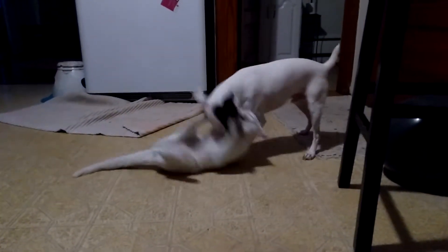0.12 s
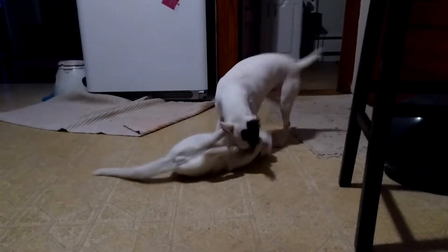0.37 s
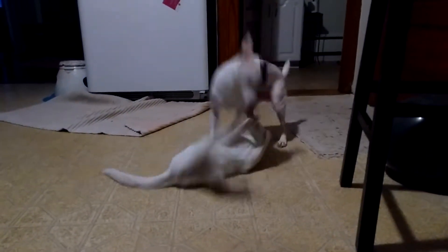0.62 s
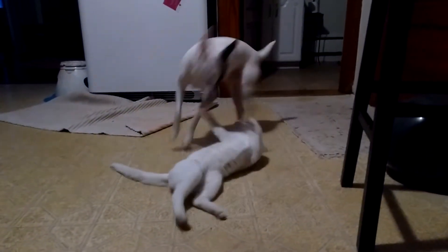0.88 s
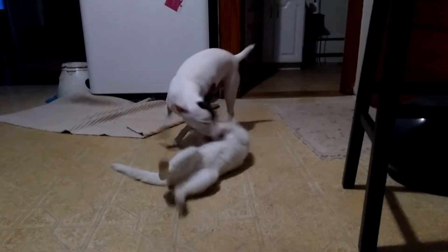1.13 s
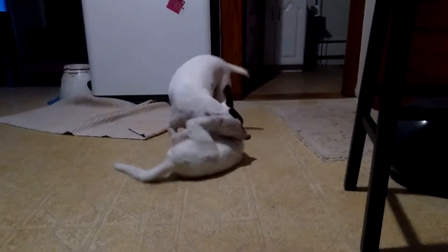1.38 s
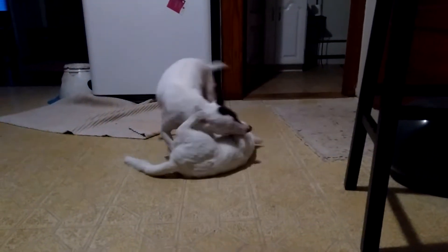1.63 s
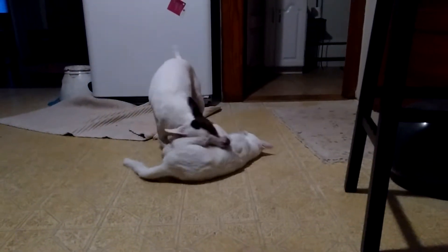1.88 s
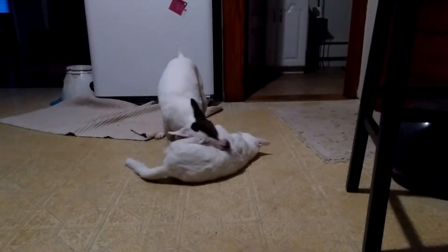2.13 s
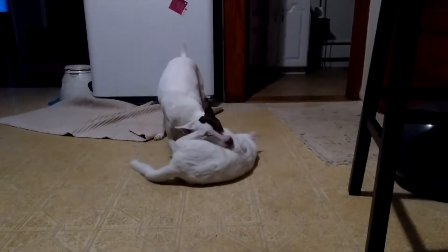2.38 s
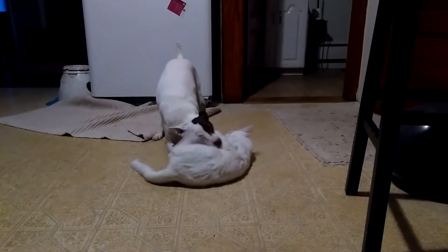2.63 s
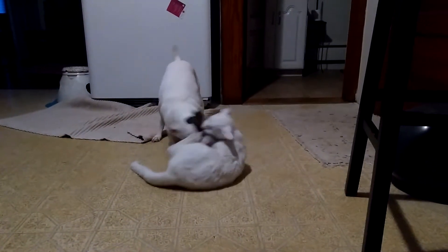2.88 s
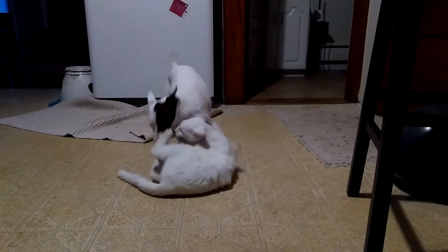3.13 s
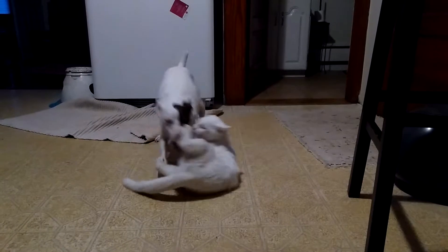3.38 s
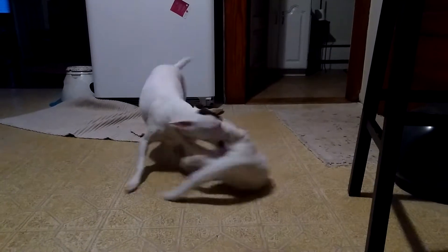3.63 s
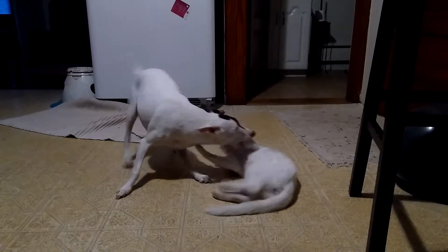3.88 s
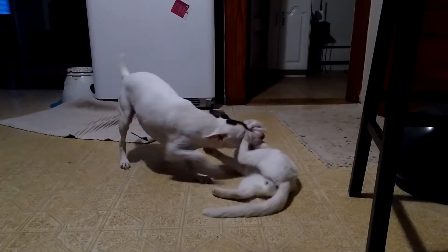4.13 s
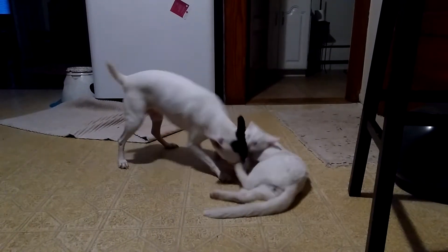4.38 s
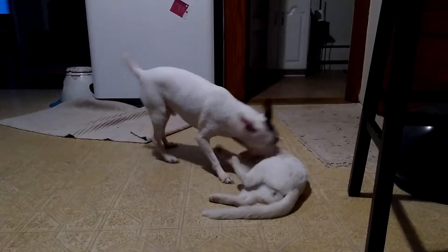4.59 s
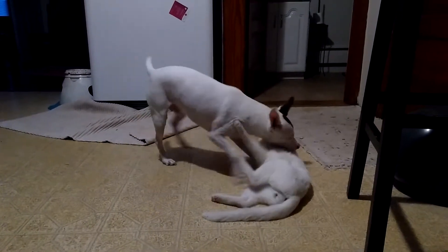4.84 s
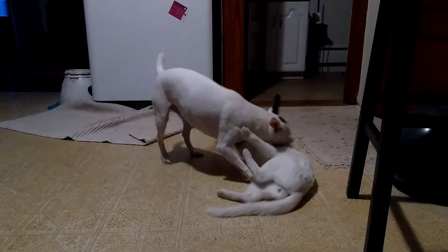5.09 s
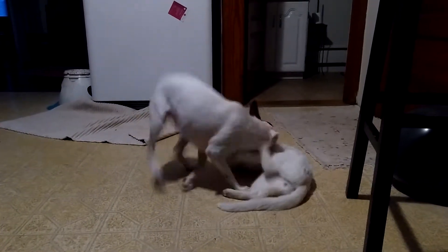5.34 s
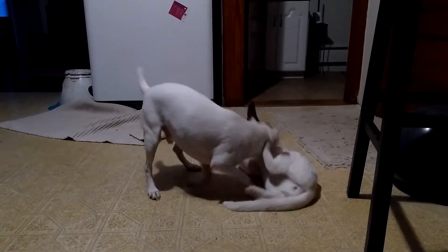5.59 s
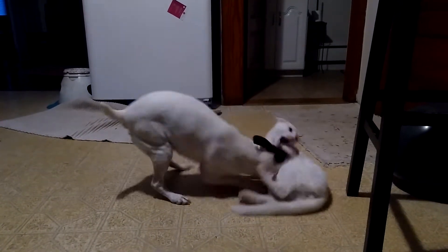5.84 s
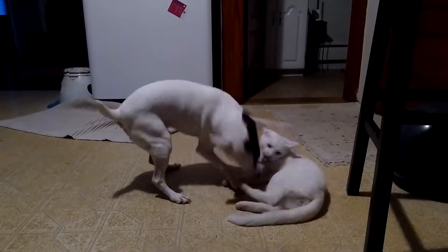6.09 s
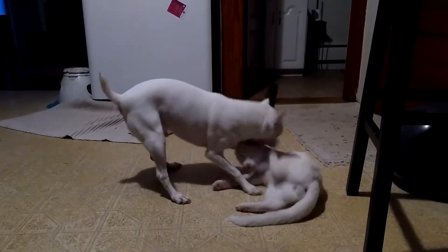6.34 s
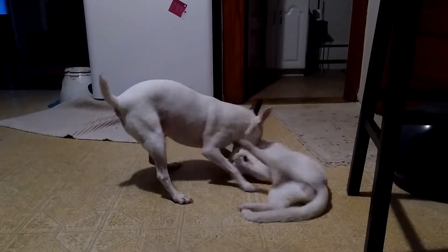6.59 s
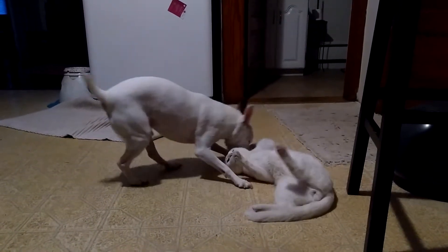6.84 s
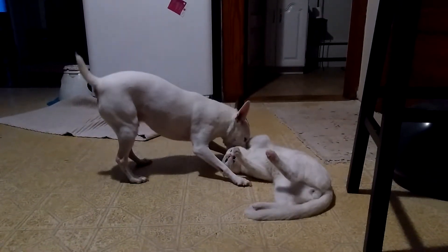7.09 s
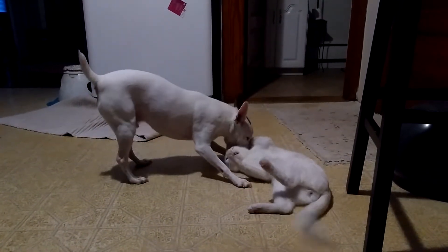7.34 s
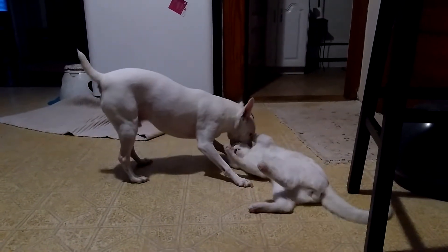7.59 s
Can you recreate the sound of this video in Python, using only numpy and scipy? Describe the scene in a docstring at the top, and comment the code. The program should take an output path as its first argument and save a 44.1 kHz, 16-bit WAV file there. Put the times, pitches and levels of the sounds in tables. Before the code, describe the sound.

Animal claws click, scratch and skid in quick irregular flurries on a hard kitchen floor, with soft body thumps and one short dog snort.

```python
"""Claws strike, tick and slide on a hard kitchen floor, close to a phone, as a dog and a cat wrestle.
Claws are shaped bursts of gritty noise and short rings; bodies thump as decaying floor modes over dull noise.
The dog snorts once, filtered noise; a faint rumble and hiss lie behind, and the kitchen echoes each sound.
Two microphones form left and right by taking a delayed copy of each off the other; the whole level
sinks and creeps back along a set curve."""
import sys
import numpy as np
from scipy import signal
from scipy.fft import rfft, irfft, next_fast_len
from scipy.io import wavfile
from scipy.ndimage import uniform_filter1d, map_coordinates

SR = 44100
rng = np.random.default_rng(int(sys.argv[2]) if len(sys.argv) > 2 else 0)


def linear_from_db(decibels):
    """Turn decibels (scalar or array-like) into linear amplitude factors; 0 gives 1."""
    return 10 ** (np.asarray(decibels, float) / 20)


def wav_out(sig):
    """Save sig, one row per channel (or a flat mono array), as 16-bit PCM at SR to the path in sys.argv[1]."""
    wavfile.write(sys.argv[1], SR, np.round(np.clip(np.atleast_2d(sig).T, -1, 1) * 32767).astype(np.int16))


N = 340452


def unit(x):
    """Scales to rms 1 along the last axis."""
    return x / np.sqrt(np.mean(x ** 2, axis=-1, keepdims=True) + 1e-20)


def along(points, hz):
    """Reads a curve of (Hz, value) points on a log frequency axis."""
    f, v = np.transpose(points)
    return np.interp(np.log(hz + 1), np.log(f + 1), v)


def filtered(x, response):
    """Multiplies the spectrum of x by a response given as a function of frequency."""
    m = next_fast_len(x.shape[-1] + 4096)
    spectrum = rfft(x, m) * response(np.fft.rfftfreq(m, 1 / SR))
    return irfft(spectrum, m)[..., :x.shape[-1]]


def bump(hz, centre_hz, width):
    """A bell over log frequency, 1 at its centre; width is a log ratio."""
    return np.exp(-(np.log((hz + 1) / centre_hz) / width) ** 2)


def sag_db(s):
    """The slow sinking and return of the whole level, in dB."""
    # Each row: time in seconds, gain in dB.
    sag_points = [(0, -2.5), (.8, -5), (1.1, -8), (2.1, -4), (3.2, -1.5), (3.8, -1.5), (4.06, -14),
                  (4.28, -10.5), (4.9, -4), (5.05, -15), (5.4, -8), (5.75, -10.5), (5.92, -18.5),
                  (6.2, -18), (6.6, -14), (7.1, -10), (7.72, -5)]
    return np.interp(s, *np.transpose(sag_points))


def kitchen(x, wet_db):
    """Direct sound and an echo whose decay depends on frequency, drawn anew for every sound."""
    # Decay time of the room. Each row: frequency in Hz, time to fall 60 dB in seconds.
    room_decay = [(150, 0.51), (500, 0.53), (1400, 0.45), (3700, 0.36), (9700, 0.28), (16000, 0.17)]
    length = SR // 2
    hz, t, z = signal.stft(rng.standard_normal((2, length)), SR, nperseg=256)
    decay = linear_from_db(-60 * t / along(room_decay, hz)[:, None])
    tail = signal.istft(z * decay, SR, nperseg=256)[1][:, :length]
    tail *= 1 - np.exp(-np.arange(length) / SR / 0.0018)  # echoes thicken over the first milliseconds
    tail *= linear_from_db(wet_db) / np.linalg.norm(tail[0])
    tail[0, 0] = 1
    tail[1, rng.integers(4, 30)] += 0.8  # direct sound reaches the second channel a few samples late
    return signal.fftconvolve(x[None], tail, axes=1)


def add(mix, s, db, sound):
    """Places a sound at s seconds, raised by as much as the sag will take away at its start."""
    spot = mix[:, round(s * SR):][:, :sound.shape[1]]
    spot += linear_from_db(db - sag_db(s)) * sound[:, :spot.shape[1]]


def grit(count, spiky_db):
    """Noise of tiny catches, as on a rough texture: in clumps, a few much bigger than the rest."""
    clumps = map_coordinates(rng.standard_normal(count // 100 + 4), [np.arange(count) * 160 / SR])
    spikes = np.minimum(rng.exponential(size=count), 4)
    return unit(rng.standard_normal(count) * linear_from_db(spiky_db * spikes + 2.9 * clumps))


def rumble():
    """House rumble and thin hiss: shaped noise in slowly shifting patches of time and frequency."""
    # Spectrum of the room's background. Each row: frequency in Hz, relative level in dB per Hz.
    air = [(25, -23), (60, -10.5), (119, -2), (160, -6), (204, 2), (255, -7.5), (313, -3.5), (420, -14),
           (900, -16), (2000, -22.5), (3500, -25.5), (5000, -32), (8000, -30.5), (8500, -27), (9100, -30.5),
           (16000, -37.5)]
    z = signal.stft(rng.standard_normal((2, N)), nperseg=1024)[2]
    patches = uniform_filter1d(rng.standard_normal(z.shape[1:]), 5, 0)
    patches = uniform_filter1d(patches, 5, 1)
    patchy = z * linear_from_db(2.35 * patches / patches.std())
    noise = signal.istft(patchy, nperseg=1024)[1][:, :N]
    return linear_from_db(-50.5) * unit(filtered(noise, lambda hz: linear_from_db(along(air, hz))))


def snort(mix):
    """A fluttering puff of air: gritty noise through the nose's resonances, dull above them."""
    # The dog's puff. Each row: start in seconds, level in dB, decay time in seconds.
    puffs = [(6.932, -33, 0.049)]
    # Resonances of the nose. Each row: centre in Hz, width in Hz, level in dB.
    resonances = [(380, 110, -20), (760, 190, -3.5), (1060, 230, -0.5), (1238, 70, 4.5)]

    def nose(f):
        total = sum(linear_from_db(db) * 1j * f * width / (centre ** 2 - f ** 2 + 1j * f * width)
                    for centre, width, db in resonances)
        return total / (1 + (f / 1450) ** 8)

    for s, db, length in puffs:
        t = np.arange(round(5 * length * SR)) / SR
        air_burst = unit(filtered(grit(len(t), spiky_db=0.5), nose))
        puff = air_burst * np.exp(-t / length) * (1 - np.exp(-t / 0.00057))
        add(mix, s, db, kitchen(puff, wet_db=-2.5))


def thumps(mix):
    """A soft landing makes the floor boards boom briefly, over a dull flop of fur."""
    # Bodies and paws landing. Each row: start in seconds, level in dB, favoured pitch in Hz,
    # time to fall 60 dB in seconds.
    landings = [(.599, -31, 333, 0.12), (.66, -41.5, 207, 0.17), (.945, -44, 330, 0.26),
                (1.252, -40.5, 293, 0.22), (1.261, -36.5, 120, 0.15), (1.408, -37, 273, 0.077),
                (1.429, -34.5, 109, 0.077), (1.643, -45, 344, 0.022), (2.976, -34, 1090, 0.021),
                (3.031, -34.5, 225, 0.17), (3.205, -38.5, 260, 0.062), (3.604, -44, 206, .022),
                (3.779, -37, 143, 0.12), (4.237, -39.5, 245, 0.034), (5.245, -44, 298, 0.056),
                (5.348, -36, 192, 0.046), (5.76, -36.5, 109.7, 0.029), (6.331, -40, 540, 0.046),
                (6.803, -43, 134, .044)]
    # Modes of the floor, in Hz.
    boards_hz = np.array([108, 125, 141, 205, 240, 285, 322, 555, 1070])
    reach = 0.11  # a landing wakes the modes this near its favoured pitch (log ratio)
    t = np.arange(SR // 5) / SR
    modes = np.sin(2 * np.pi * np.outer(boards_hz, t))
    for s, db, hz, t60 in landings:
        flop = unit(filtered(rng.standard_normal(len(t)), lambda f: bump(f, hz, 0.45)))
        woken = np.exp(-(np.log(boards_hz / hz) / reach) ** 2)
        boom = woken @ modes / np.linalg.norm(woken)
        envelope = linear_from_db(-60 * t / t60) * (1 - np.exp(-t * hz * 2))
        add(mix, s, db, kitchen((boom + 0.5 * flop) * envelope, wet_db=-10))


def claw_colour(x, breadth_db, favoured_hz):
    """A flat contact spreads to knock and hiss; a claw favouring a higher band knocks less, hisses more."""
    # Common spectrum of the claws. Each row: frequency in Hz, level in dB.
    claw_spectrum = [(150, -22), (400, -11.5), (1000, -5), (1600, 2), (2400, 4), (3700, 3.5), (6000, 5.5),
                     (9000, 2.5), (12000, -0.5), (15000, -7), (17000, -32)]
    octaves = np.log2(favoured_hz / 4000)  # above or below a plain claw
    knock_db = breadth_db - 6.5 * octaves
    hiss_db = 0.5 * breadth_db + 1 * octaves
    tilt = [(1300, knock_db), (3200, 0.0049), (6500, 0), (11500, hiss_db)]

    def colour(hz):
        favoured_db = 5.4 * bump(hz, favoured_hz, 0.48)
        return linear_from_db(along(claw_spectrum, hz) + along(tilt, hz) + favoured_db)

    return filtered(x, colour)


def slides(mix):
    """Claws dragged along the floor: gritty noise that swells and fades."""
    # Each row: time of the height in seconds, level in dB, breadth of the spectrum in dB,
    # favoured band in Hz, half length in seconds.
    drags = [(0.278, -37, -8, 4940, 0.023), (0.561, -43, 5.5, 3800, 0.038), (.616, -43.5, -1, 3700, 0.075),
             (0.829, -46.5, -9.5, 3940, 0.041), (0.952, -35, -1, 6900, 0.037),
             (1.02, -36.5, -2.5, 7000, 0.032), (1.238, -49, -8, 1840, 0.023), (1.274, -43, -4, 5890, 0.058),
             (1.413, -36.5, 3, 4100, .015), (1.795, -45.5, 0.5, 3770, 0.058),
             (1.938, -56.5, -7, 3400, 0.033), (3.074, -77, 26, 8300, 0.22), (3.228, -40.5, -9, 6500, 0.017),
             (3.354, -36, -9, 3500, 0.048), (3.523, -41.5, -0.5, 3570, 0.054),
             (3.591, -36.5, -3, 6260, 0.026), (3.748, -46, -4, 2600, 0.025),
             (3.841, -60.5, 11, 3300, 0.093), (4.015, -48, 3, 4730, 0.044), (4.321, -46, -0.5, 5450, 0.023),
             (4.493, -41.5, -1, 4300, 0.011), (4.638, -49.5, -7, 3860, .03), (4.829, -44, -13, 3440, 0.025),
             (4.872, -40.5, -3, 3420, 0.01), (5.041, -38, 0.5, 6300, 0.031),
             (5.093, -35, -8.5, 2750, 0.016), (5.225, -45, -1.5, 3520, .035),
             (5.308, -46, -24, 3560, 0.049), (5.578, -61, 3.5, 3700, 0.055), (5.645, -45, -7, 3140, 0.1),
             (5.705, -55, 10, 3760, 0.016), (5.875, -62.5, 3, 3180, 0.1), (6.167, -66, 4, 4170, 0.032),
             (6.459, -40, -3, 5460, 0.015), (6.705, -58.5, -4, 3870, 0.13), (6.91, -56.5, -3, 3400, 0.11),
             (6.969, -48, 4, 2600, 0.011)]
    t = np.arange(SR // 5) / SR
    middle = t[-1] / 2
    for s, db, breadth_db, hz, half in drags:
        stroke = np.exp(-2 * ((t - middle) / half) ** 2)
        drag = claw_colour(grit(len(t), spiky_db=2.0) * stroke, breadth_db, hz)
        add(mix, s - middle, db, kitchen(drag, wet_db=5.5))


def strikes(mix):
    """Claws strike the floor: gritty noise that bites in and skids to a stop."""
    # Each row: start in seconds, level in dB, breadth of the spectrum in dB, favoured band in Hz,
    # decay time of the skid in seconds.
    hits = [(0.0646, -31.5, 6, 4000, 0.015), (0.209, -38.5, -2, 3800, 0.023),
            (0.3656, -34, 0.5, 5700, 0.016), (0.5272, -28.5, 4, 4100, 0.0044),
            (.5993, -26, 3.5, 1900, 0.0057), (0.8056, -35, -7, 5400, 0.015), (0.9245, -32, 5.5, 3500, 0.02),
            (1.2207, -42, 1, 4120, 0.0077), (1.25, -29.5, 6.5, 5370, 0.015),
            (1.4101, -28.5, 0, 6300, 0.0081), (1.6467, -33, 9.5, 5450, 0.016),
            (1.6594, -28, -22, 8950, 0.0084), (3.2067, -26.5, 9.5, 6500, 0.0054),
            (3.6161, -28, -2, 3730, 0.0081), (3.922, -35, -14, 9800, 0.011),
            (4.2316, -31.5, -2, 5300, 0.0097), (4.4924, -31, -18, 3420, 0.0076),
            (4.6007, -29, 3.5, 4860, 0.0075), (4.8177, -37.5, -15, 3430, 0.014),
            (4.9390, -27, 5, 4440, 0.0044), (5.2686, -37.5, -1.5, 6200, 0.0072),
            (5.2795, -31.5, -3, 3180, 0.011), (5.348, -30.5, -27, 8800, 0.0099),
            (5.4135, -34, -1.5, 4060, 0.0064), (5.5252, -32.5, 5.5, 3460, 0.0061),
            (5.6297, -37, 2, 3300, 0.011), (5.7512, -32.5, 3, 8600, 0.0038),
            (6.158, -57.5, -8, 3680, 0.015), (6.3303, -31, -2, 3000, 0.0065),
            (6.4421, -35, 0, 2920, 0.0084), (6.7037, -41.5, -4, 3430, .0062),
            (6.7925, -34, 3, 7050, 0.0098)]
    lead = 256  # samples of room for the colour filter to ring ahead of the contact
    t = np.arange(SR // 5) / SR
    for s, db, breadth_db, hz, skid in hits:
        envelope = np.exp(-t / max(skid, 0.001)) * (1 - np.exp(-t / 0.00017))
        contact = np.pad(grit(len(t), spiky_db=2.0) * envelope, (lead, 0))
        add(mix, s - lead / SR, db, kitchen(claw_colour(contact, breadth_db, hz), wet_db=3.5))


def ticks(mics):
    """A hard claw tip rings for a cycle or two and bounces once; it stands out of its echo."""
    # Single tips snapping on the floor. Each row: start in seconds, level in dB ahead of the lean, ring in Hz.
    snaps = [(.0638, -18, 8500), (.2858, -21, 6000), (.3666, -9, 9500), (.6020, -21, 2200),
             (.9251, -11, 10000), (1.2517, -19, 6000), (1.6578, -17, 8500), (3.2073, -12, 9000),
             (3.6166, -13, 9000), (3.9240, -8, 11000), (4.2310, -17, 5000), (4.9443, -5, 9500),
             (5.2697, -14, 9000), (5.2809, -10, 9500), (5.3473, -5, 10000), (5.4126, -10, 10500),
             (5.5300, -19, 10500), (5.6314, -24, 9500), (5.7519, -9, 9500), (5.7536, -11, 9500),
             (6.3305, -26, 3100), (6.7940, -21, 9000)]
    lean = linear_from_db([[8.5], [0]])  # the first microphone faces the floor
    t = np.arange(200) / SR
    for s, db, hz in snaps:
        envelope = np.exp(-t * hz / 2) * (1 - np.exp(-t * hz * 1.5))
        snap = 1.5 * np.sin(2 * np.pi * hz * t) * envelope
        bounce = 0.4 * np.pad(snap, (rng.integers(30, 60), 0))[:len(t)]
        add(mics, s, db, lean * kitchen(snap + bounce, wet_db=-11))


def two_mics(pair):
    """Turns a pair of signals into the sum and difference of two microphones that agree in the bass."""
    # Difference against sum of the microphones. Each row: frequency in Hz, ratio in dB.
    apart = [(60, -14.5), (250, -11.5), (500, -5.5), (800, -1.5), (1500, 0.5), (2500, 0.5), (16000, 0.5)]

    def shares(hz):
        turn = np.arctan(linear_from_db(along(apart, hz)))
        return np.array([np.cos(turn), np.sin(turn)])

    both, differ = filtered(pair, shares)
    return np.array([both + differ, both - differ])


def scene():
    """Everything as it reaches the two microphones."""
    mix = rumble()
    for source in strikes, slides, thumps, snort:
        source(mix)
    mics = two_mics(mix)
    ticks(mics)
    return mics


def low_pass(x):
    """Removes everything above the highest recorded frequency."""
    return signal.sosfilt(signal.butter(12, 16820, fs=SR, output="sos"), x)


def record(dry):
    """Each side is one microphone less a late copy of the other; a bass lift makes up what cancels."""
    # First microphone against the second. Each row: frequency in Hz, gain in dB.
    near_mic = [(500, 1.5), (1600, -1), (2400, 0.5), (4000, -1), (6000, -6.5), (8500, -6.5), (11000, -8.5),
                (16000, -2)]
    # Copies taken off the left and off the right. Each row: frequency in Hz, gain in dB.
    into_left = [(100, 2.5), (1000, 1.5), (1600, -1), (2400, 2.8), (3700, -2), (6000, -2), (8500, -1),
                 (10300, -5), (11500, -20), (16000, -22)]
    into_right = [(100, -3), (2400, -3), (3700, -5), (6000, -8), (8000, -17), (9500, -12), (11200, -6),
                  (16000, -7)]
    # Delays of those copies. Each row: frequency in Hz, delay in samples.
    lag_left = [(1000, 19), (2000, 18.1), (16000, 18.05)]
    lag_right = [(100, 18.05), (5000, 18.05), (8000, 17.75), (11700, 16.96), (14100, 17.2), (16000, 17.3)]
    # Response of the phone. Each row: frequency in Hz, gain in dB.
    phone = [(25, -18), (50, 18.5), (100, 13), (700, 0.5), (15000, 0), (15700, -18), (17000, -27)]

    def late_copy(x, gain, lag):
        return filtered(x, lambda hz: linear_from_db(along(gain, hz)) * np.exp(-2j * np.pi * hz * along(lag, hz) / SR))

    circuit_hiss = linear_from_db(-73) * rng.standard_normal((2, N))
    mics = dry * linear_from_db(sag_db(np.arange(N) / SR)) + circuit_hiss
    first = filtered(mics[0], lambda hz: linear_from_db(along(near_mic, hz)))
    second = mics[1]
    left = first - late_copy(second, into_left, lag_left)
    right = second - late_copy(first, into_right, lag_right)
    right = linear_from_db(3.1) * right  # the right side is turned up
    sides = filtered(np.array([left, right]), lambda hz: linear_from_db(along(phone, hz)))
    return low_pass(sides)


dry = scene()
out = record(dry)
wav_out(out)
```